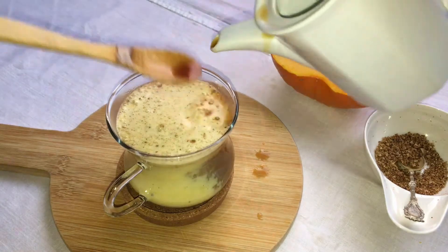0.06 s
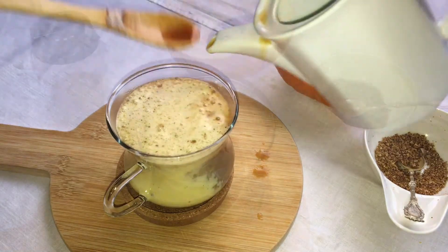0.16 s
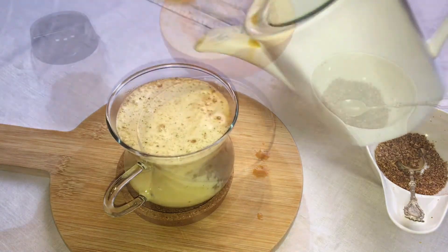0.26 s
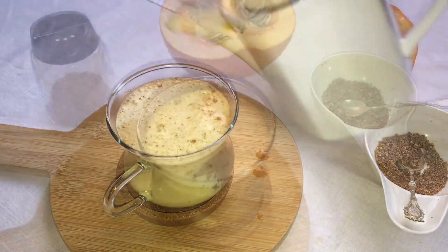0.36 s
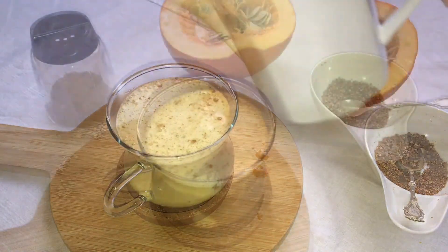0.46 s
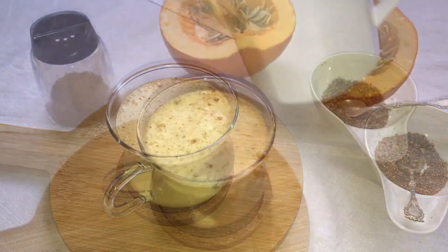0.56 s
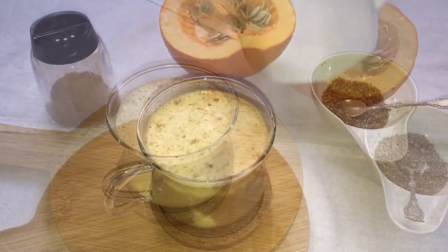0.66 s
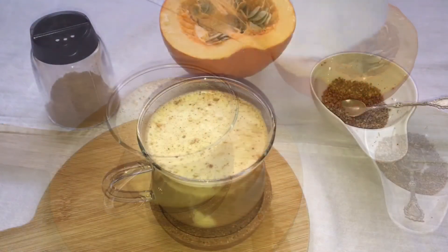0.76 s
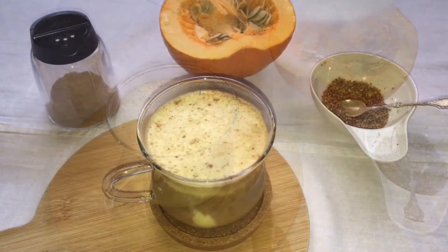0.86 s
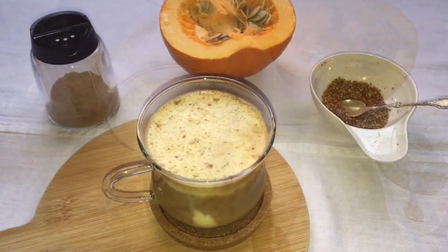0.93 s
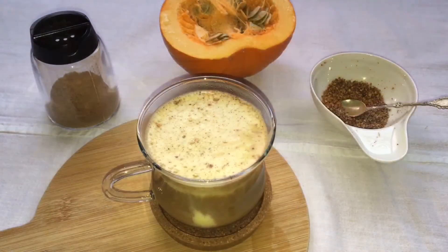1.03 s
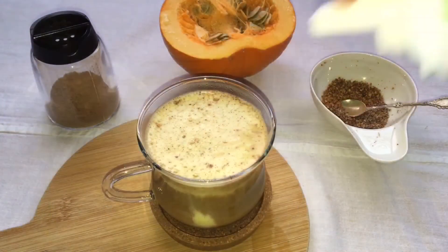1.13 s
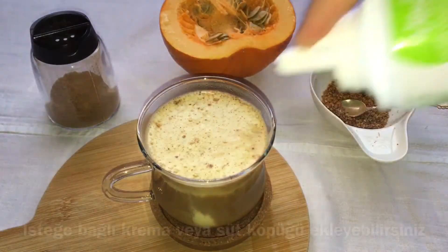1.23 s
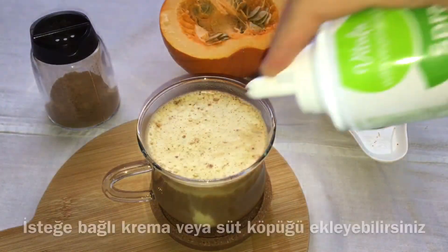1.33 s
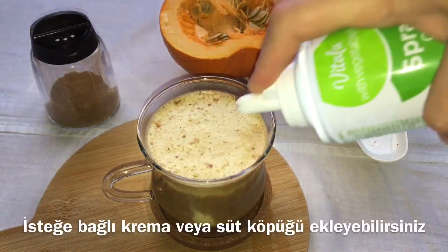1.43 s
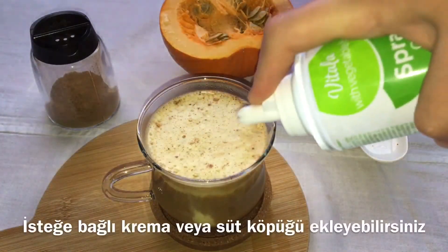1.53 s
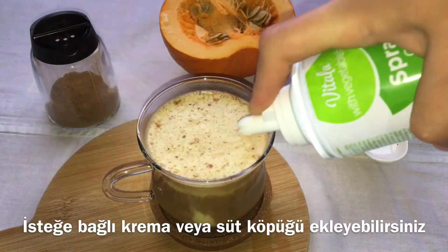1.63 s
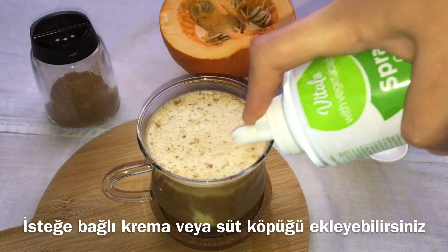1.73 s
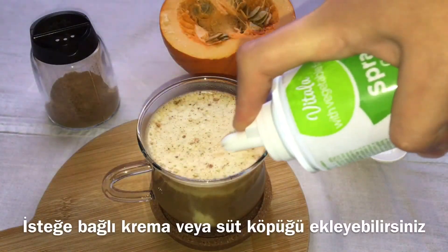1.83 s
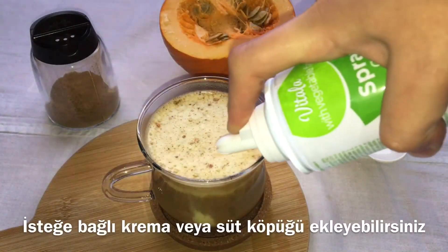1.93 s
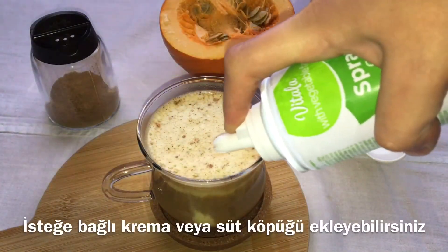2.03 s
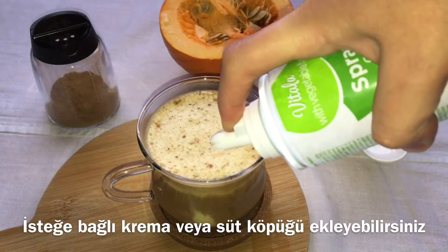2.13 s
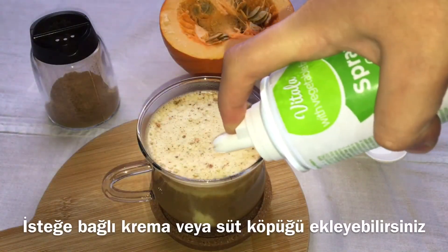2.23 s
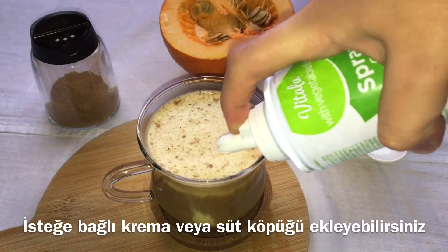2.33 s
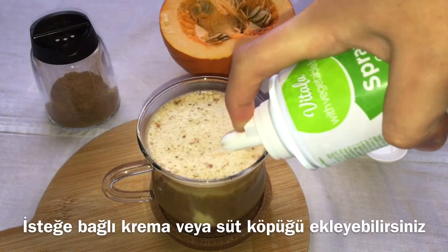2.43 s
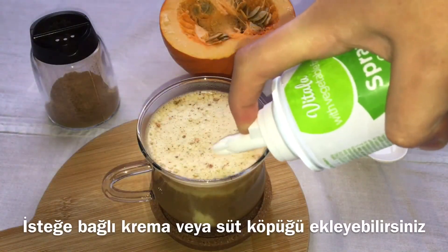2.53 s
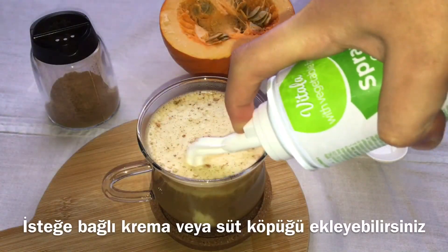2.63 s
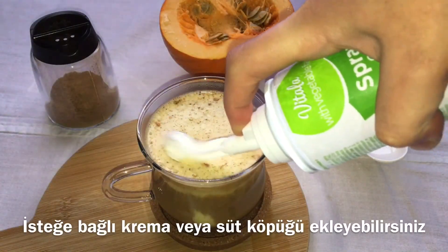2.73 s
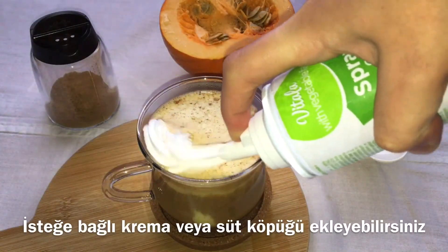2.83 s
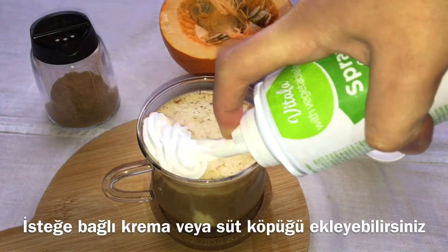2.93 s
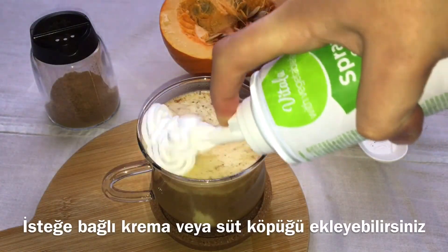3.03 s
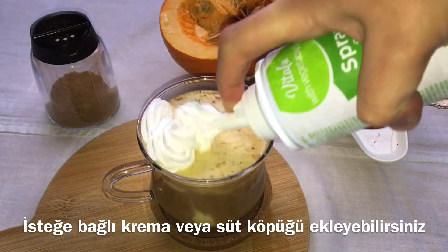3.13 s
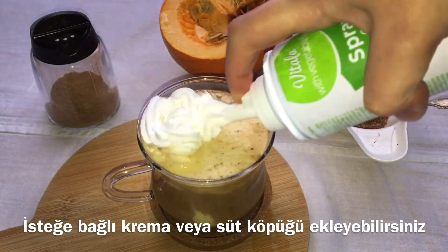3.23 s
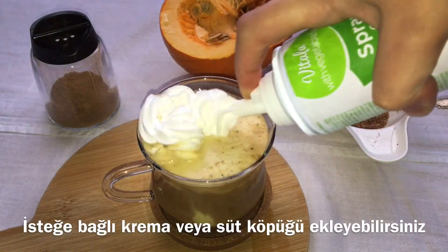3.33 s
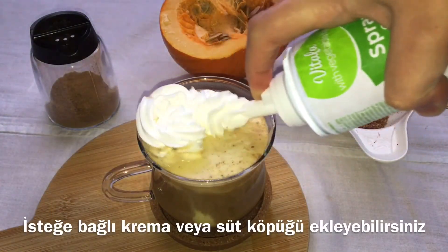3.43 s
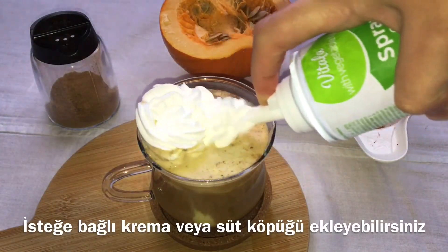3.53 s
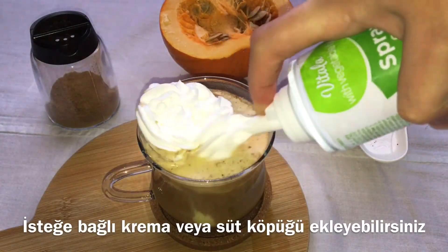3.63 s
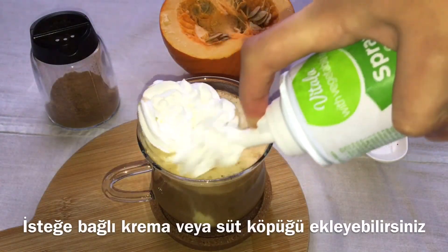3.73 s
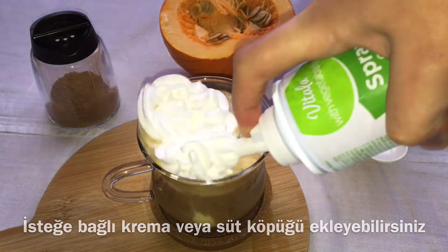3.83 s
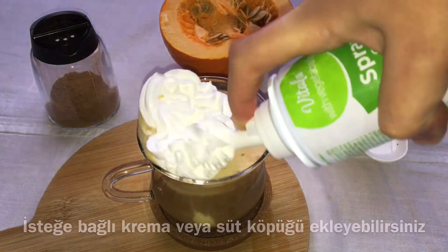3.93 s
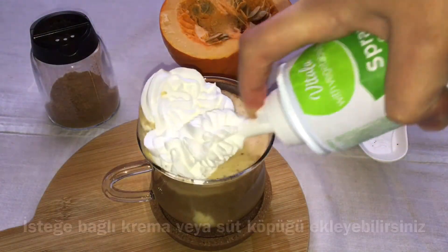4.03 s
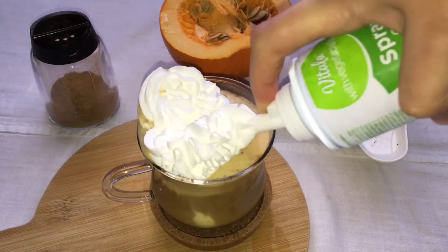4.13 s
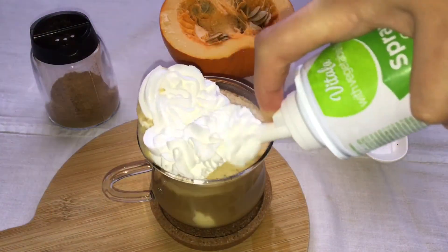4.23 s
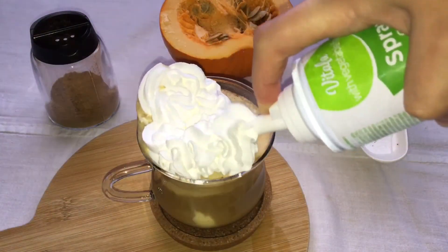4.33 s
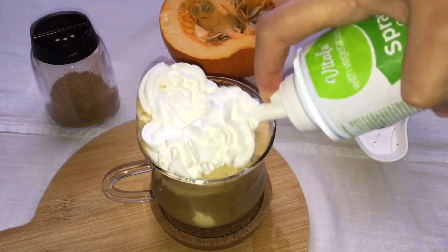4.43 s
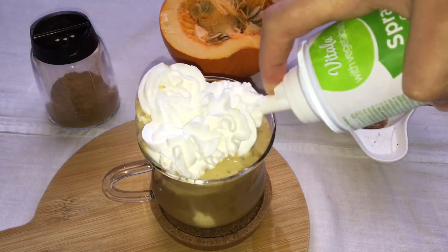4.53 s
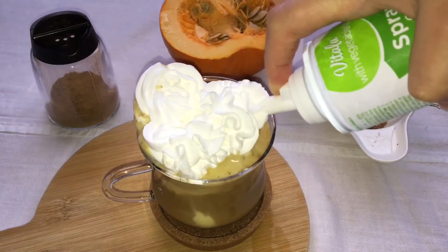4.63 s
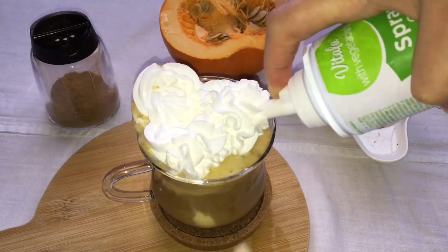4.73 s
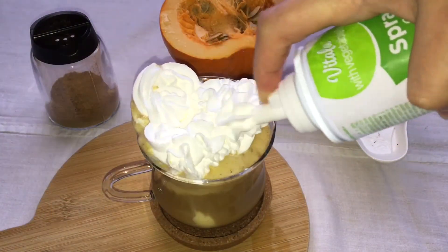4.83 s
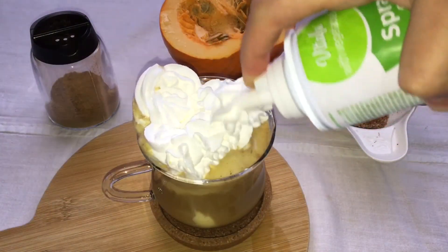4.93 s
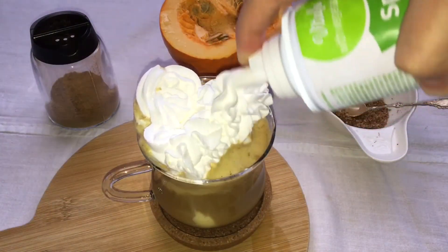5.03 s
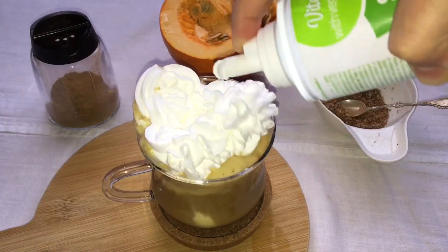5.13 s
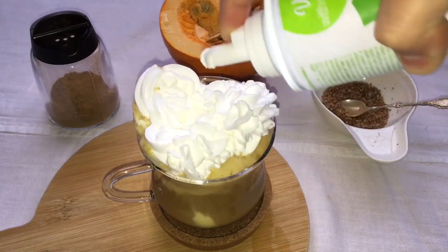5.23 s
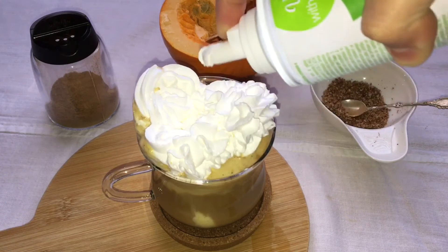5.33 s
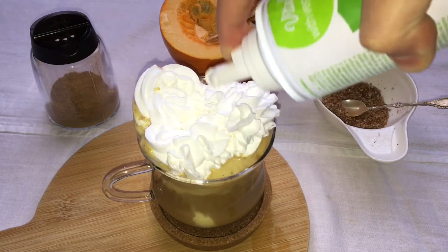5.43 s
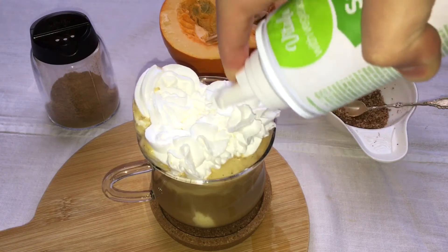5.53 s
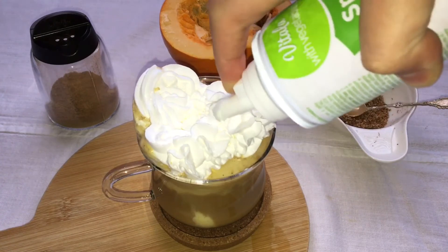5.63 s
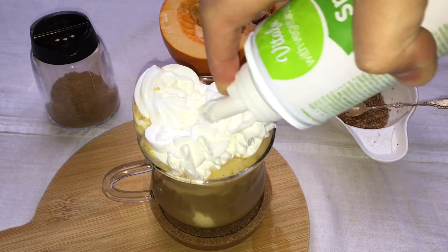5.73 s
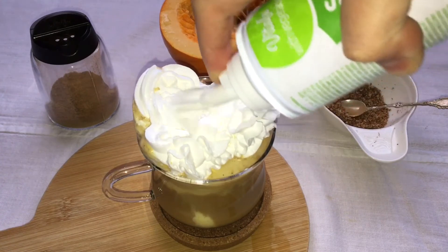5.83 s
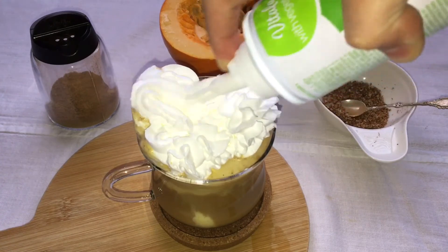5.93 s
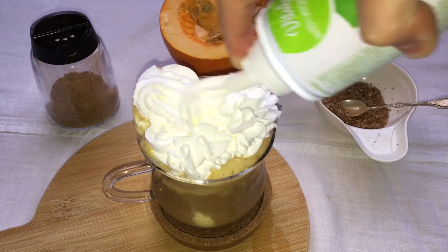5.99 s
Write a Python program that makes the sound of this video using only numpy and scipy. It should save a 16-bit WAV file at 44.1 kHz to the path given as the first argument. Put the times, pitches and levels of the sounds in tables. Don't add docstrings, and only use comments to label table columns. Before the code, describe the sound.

Close single microphone in a small, quiet room. Faint clinks, scraping and dull table thumps come first, then near silence. A pressurised can spits, then streams foam steadily onto a drink, a dense hiss full of tiny bubble pops and bigger wet bursts over a muffled gurgle. The flow breaks up and ends with a small tick. Under a second of room hush follows, then a softer, spluttering spray starts.

```python
import sys
import numpy as np
from scipy import signal
from scipy.fft import rfft, irfft
from scipy.io import wavfile
from scipy.ndimage import uniform_filter1d

SR = 44100
rng = np.random.default_rng(int(sys.argv[2]) if len(sys.argv) > 2 else 0)


def attenuation_scalar(level_db):
    decades = np.asarray(level_db, float) / 20
    return 10 ** decades


def waveform_to_disk(signal):
    frames = np.transpose(np.atleast_2d(signal))
    scaled = np.clip(frames, -1, 1) * 32767
    samples = np.round(scaled).astype(np.int16)
    wavfile.write(sys.argv[1], SR, samples)


N = 267246

# f/Hz, density/dB per Hz
ROOM_SPECTRUM = [(12, -38), (20, -5.5), (59, 4), (81, -2), (98, -12), (133, -11), (191, -12.5),
                 (220, -10.5), (260, -16), (507, -27.5), (963, -29.5), (1080, -30.5), (1170, -30.5),
                 (2280, -37), (15600, -44.5)]
# t/s, level/dB, rise/s, fall/s
TRAFFIC_SWELLS = [(.5, -69, 0.33, .1), (1.1, -72, 0.23, .1), (2.12, -68.5, 0.54, 0.25),
                  (2.7, -68, 0.17, 0.36), (3.14, -61.5, .12, 0.1), (3.8, -71.5, .3, 0.17),
                  (5.2, -65, .25, 0.11), (6.06, -64, 0.053, .1)]
ROOM_TONE_DB, RUMBLE_DB = -65, -80

KITCHEN_T60_S, BRIGHT_T60_S = 0.39, 0.3
KITCHEN_DB, HANDLING_ECHO_DB = -18.5, -11

# t/s, level/dB (peak)
SPOON_TAPS = [
    (.4665, -37),
    (.485, -54),
]
# f/Hz, level/dB, T60/s
SPOON_MODES = [(763, -21, 0.12), (1900, -6, 0.0088), (2160, -27, 0.29), (3070, 0, 0.028), (3480, -8, .008),
               (3790, -1.5, 0.031), (5000, 0, 0.0044), (6000, -9, 0.01), (8000, -30, 0.009)]
# t/s, level/dB (peak)
JUG_TAPS = [
    (.8432, -40),
    (.8442, -33.5),
    (.875, -51),
]
# f/Hz, level/dB, T60/s
JUG_MODES = [(794, 3, 0.022), (817, -16, .2), (1000, -19, 0.018), (1728, -1.5, 0.066), (2420, -3.5, 0.014),
             (2830, -9, 0.053), (2820, -30, 0.088), (3200, -38, 0.045), (6280, -19, 0.015)]
JUG_HELD_S, JUG_HELD_DB_PER_S = .884, -1200
# t/s, level/dB (peak)
TABLE_THUMPS = [(0.03, -50.5), (0.484, -57), (0.914, -48.5), (0.96, -48), (1.235, -49), (1.261, -49),
                (1.54, -40.5), (1.554, -37.5), (1.574, -32)]
# f/Hz, level/dB, T60/s
TABLE_MODES = [(126.5, -1.5, 0.68), (166.7, 1, 0.37), (203, -10, 0.54), (250.4, -10, 0.38),
               (330, -13, 0.35), (372.5, -19, 0.25), (490, -20, 0.1), (620, -14.5, 0.34), (760, -18, 0.12)]
# t/s, level/dB (peak), f/Hz, snap level/dB over the tick
TICKS = [(.445, -71, 4900, -2), (.619, -62, 1280, -8), (.655, -60, 5500, -2), (.67, -57, 1970, -8),
         (.709, -58, 1360, -8), (.722, -55, 1980, 0), (.742, -66, 2070, -6), (.7562, -48.5, 1000, -8),
         (.78, -56, 1300, -10), (.927, -55, 3000, -4), (1.068, -63, 1410, -8), (4.804, -36.5, 1530, -7)]
# t/s, level/dB, rise/s, fall/s
SCRAPES = [(.47, -61.5, 0.0039, 0.042), (.58, -83, .05, .1), (.66, -66, 0.067, 0.028),
           (.765, -66, .01, 0.051), (.933, -56.5, 0.015, 0.027), (1.0, -77.5, .05, .3)]
# t/s, level/dB, rise/s, fall/s
SWISHES = [(.485, -61.5, .01, 0.045), (.66, -71, .04, 0.035), (.76, -71, .04, .015), (.85, -69, .01, .03),
           (.935, -76, .01, 0.027), (1.1, -81, .1, .1)]
# t/s, level/dB, rise/s, fall/s
RIM_SINGING = [(.5, -67, .015, 0.053), (.6, -84, .04, .04), (.675, -69, .006, 0.017),
               (.72, -72, 0.017, .02), (.765, -72, .02, .015)]
# t/s, level/dB, rise/s, fall/s
LOOSE_THUDS = [(1.57, -52.5, 0.02, 0.083), (1.265, -62.5, .02, .02), (1.1, -65, .02, 0.026)]
# t/s, level/dB, rise/s, fall/s
VALVE_CREAKS = [
    (2.25, -76, .1, 0.018),
    (2.325, -77, .02, .04),
]
# t/s, level/dB, rise/s, fall/s
TABLE_HUM = [
    (4.1, -60, 0.21, 0.38),
]

# f/Hz, density/dB per Hz
JET_SPECTRUM = [(590, -27), (1000, -20.5), (2340, 1.5), (2780, -8), (3710, -1), (4840, -5.5), (5300, -8.5),
                (11200, -8), (15600, -16.5)]
# f/Hz, density/dB per Hz
BURBLE_SPECTRUM = [(53, -42), (90, -20), (118, -26.5), (324, -1), (500, -5), (655, -8.5), (786, -11.5),
                   (900, -13), (1170, -46), (1980, -120)]
# f/Hz, width/Hz, depth/dB
SPRAY_DIPS = [(495, 153, -7), (812, 75, -13.5), (1127, 12.6, -17.5), (2820, 1200, -1.5),
              (4870, 140, -14), (7740, 250, -6), (10450, 540, -6.5)]
# t/s, gas flow as hiss level/dB, cream load/dB over the gas
SPURT = [
    (2.42, -89, 1),
    (2.475, -64, 8.5),
    (2.52, -50, 3.5),
    (2.57, -47.5, 5),
    (2.59, -54, 1),
    (2.62, -57, 3.5),
    (2.69, -50, 0.5),
]
STREAM = [(2.712, -43, 3.5), (2.75, -40.5, 2.5), (3.14, -38, 0.5), (3.5, -39.5, 3), (3.86, -37, -1.5),
          (4.1, -38, 0.5), (4.3, -36.5, -2), (4.448, -37.5, 0)]
SPLUTTER = [(4.5, -45, 0.5), (4.53, -46.5, -3), (4.56, -44, 1), (4.64, -41, 0), (4.68, -43.5, 2),
            (4.76, -42, -0.5), (4.804, -44.5, -2)]
TOP_UP = [(5.64, -80, -9), (5.7, -67, 0), (5.73, -57.5, 6.5), (5.755, -54, -1), (5.785, -48.5, 9),
          (5.811, -43, 6), (5.9, -43.5, -0.5), (5.96, -44, 4), (6.06, -42, -1)]
# t/s, share of the hiss that skips the dips/0-1
CLEAR_SHARE = [(2.9, 0.23), (3.1, 0.33), (3.3, 0.1), (3.55, 0.12), (3.7, 0.48), (4.0, 0.47), (4.4, 0.42),
               (4.6, 0.22), (6.06, .1)]
# t/s, lift/dB, rise/s, fall/s
SMALL_BUBBLES = [
    (3.25, 4.5, 0.48, 0.55),
]
# t/s, level/dB (peak), f/Hz, snap level/dB over the pop
SPLATS = [(2.4812, -35.5, 1300, -18), (2.5203, -29, 1340, -15), (2.5693, -27, 1476, -12),
          (2.6222, -34, 1920, -10), (2.6344, -33, 1690, -8), (2.6572, -36, 1800, -9),
          (2.7162, -21, 1660, -10), (4.4712, -20.5, 2130, -3), (4.512, -24.5, 1850, -11),
          (4.546, -22.5, 2210, -1), (4.5578, -21, 1840, -6), (4.5787, -14.5, 2180, -12),
          (4.5894, -19, 2050, -17), (4.624, -21, 2100, -8), (4.6802, -23.5, 2500, -0.5),
          (4.7135, -31, 1660, -4), (4.719, -16.5, 2500, -8), (4.7389, -19.5, 1900, -8),
          (4.7595, -20, 2690, -1), (4.7828, -28.5, 1950, 10.5), (5.6785, -47.5, 2540, -2),
          (5.7194, -27, 1760, -20), (5.7746, -28, 1670, -13), (5.7626, -25.5, 1240, -17),
          (5.7829, -28, 1710, -17), (5.8926, -22.5, 2380, -16), (5.9472, -27, 1380, -12),
          (5.9671, -22, 2350, -4), (6.0016, -23.5, 1940, -8), (6.0515, -19, 1570, -15)]
# t/s, level/dB (peak)
BURSTS = [(2.9307, -24), (2.9529, -20.5), (3.0737, -16.5), (3.0924, -14.5), (3.1234, -15), (3.1329, -18),
          (3.1877, -20.5), (3.2057, -20), (3.2641, -15.5), (3.279, -20), (3.3083, -20), (3.3593, -25.5),
          (3.4349, -19), (3.4621, -16), (3.507, -17.5), (3.5841, -13.5), (3.6339, -17), (3.681, -16.5),
          (3.8988, -29), (3.9138, -13), (3.9903, -17), (3.9957, -15), (4.0644, -15.5), (4.1302, -16.5),
          (4.1753, -18), (4.2902, -22), (4.3424, -22), (4.3599, -17.5), (4.4375, -15.5)]
# t/s, level/dB over the hiss, rise/s, fall/s
LOWER_WHISTLE = [(3.1, -11, .1, 0.13), (3.75, -12.5, .08, .3), (4.4, -10, .2, .1)]
UPPER_WHISTLE_DB, UPPER_DB_PER_SHARE = -7, -45
FULL_POPS_PER_S, FULL_HISS_DB = 1800, -37
MUG_HZ, MUG_T60_S = 328, 0.024
BURBLE_FULL_DB, BURBLE_KNEE_DB, BURBLE_FOLLOWS, BURBLE_WOBBLE_DB = -49, -46.5, 1, 1.5
BURST_HZ, BURST_HZ_SPREAD = 2080, .08
BURST_SNAP_DB, SNAP_DB_PER_S, SNAP_SPREAD_DB = -10, 5, 1.5


def rms_one(x):
    return x / np.sqrt(np.mean(x ** 2) + 1e-20)


def evened(x, span_s):
    return x / np.sqrt(uniform_filter1d(x ** 2, size=round(span_s * SR)) + 1e-12)


def in_time(rows):
    s, *columns = np.transpose(rows)
    return [np.interp(np.arange(N) / SR, s, c) for c in columns]


def level(rows, column):
    rows = np.array(rows)
    return attenuation_scalar(np.interp(np.arange(N) / SR, rows[:, 0], rows[:, column], left=-140, right=-140))


def swells(rows):
    t = np.arange(N) / SR
    return sum(attenuation_scalar(db) * np.exp(-np.where(t < s, (s - t) / rise, (t - s) / fall))
               for s, db, rise, fall in rows)


def drift(rate):
    r = np.exp(-2 * np.pi * rate / SR)
    slow = signal.lfilter([1], [1, -2 * r, r * r], rng.standard_normal(N + SR))[SR:]
    return rms_one(slow - slow.mean())


def coloured(spectrum):
    hz, db = np.transpose(spectrum)
    bins = np.maximum(np.arange(N // 2 + 1) * SR / N, 1)
    gain = attenuation_scalar(np.interp(np.log(bins), np.log(hz), db))
    return rms_one(irfft(rfft(rng.standard_normal(N)) * gain, N))


def band(x, low_hz, high_hz):
    return signal.sosfilt(signal.butter(2, [low_hz, high_hz], "band", fs=SR, output="sos"), x)


def ring(clicks, hz, t60):
    r, w = attenuation_scalar(-60 / (t60 * SR)), 2 * np.pi * hz / SR
    return signal.lfilter([0, np.sin(w)], [1, -2 * r * np.cos(w), r * r], clicks + 1e-18)


def struck(hits, modes, soft_hz, thin_hz, scatter_db):
    hits, out = np.array(hits), 0
    luck = rng.standard_normal((len(hits), len(modes)))
    for k, (hz, db, t60) in enumerate(modes):
        clicks = np.zeros(N)
        clicks[(hits[:, 0] * SR).astype(int)] = -attenuation_scalar(hits[:, 1] + db + scatter_db * luck[:, k])
        out = out + ring(clicks, hz, t60)
    return band(out, thin_hz, soft_hz)


def blips(events, turns, snap_db, masked=0):
    length = 800
    out = np.zeros(N + length)
    t = np.arange(length) / SR
    puff = band(rng.standard_normal((len(events), length)), 5000, 11000)
    for (s, db, hz, bright_db), noise in zip(events, puff):
        u = t * hz / turns
        overtone = 0.41 * np.exp(-.3 * u) * np.sin(4.1 * np.pi * hz * t)
        swing = -np.e * u * np.exp(-u) * (np.sin(2 * np.pi * hz * t) - overtone)
        snap = attenuation_scalar(snap_db + bright_db) * noise * np.exp(-t / 0.0016)
        height = max(attenuation_scalar(db) - (masked * np.ones(N))[round(s * SR)], attenuation_scalar(db - 14))
        out[round((s - turns / hz) * SR):][:length] += height * (swing + snap)
    return out[:N]


def hush():
    tone = coloured(ROOM_SPECTRUM)
    rumble = rms_one(signal.sosfilt(signal.butter(4, 110, fs=SR, output="sos"), tone))
    rumble = 0.89 * rumble + 0.7 * rms_one(ring(tone, 49.5, 0.65))
    upper = rms_one(signal.sosfilt(signal.butter(4, 110, "high", fs=SR, output="sos"), tone))
    return attenuation_scalar(ROOM_TONE_DB) * upper + (attenuation_scalar(RUMBLE_DB) + swells(TRAFFIC_SWELLS)) * rumble


def kitchen(x):
    t = np.arange(SR // 2) / SR
    white = rng.standard_normal((2, len(t)))
    tail = band(white[0], 80, 4040) * attenuation_scalar(-60 * t / KITCHEN_T60_S)
    tail = tail + band(white[1], 5100, 12000) * attenuation_scalar(-60 * t / BRIGHT_T60_S)
    tail = tail * np.clip((t - .004) / 0.004, 0, 1)
    return signal.fftconvolve(x, tail / np.sqrt(np.sum(tail ** 2)))[:N]


def rustle():
    low, high = rng.standard_normal((2, N)) * attenuation_scalar(2.2 * drift(60))
    scrape = swells(SCRAPES) * rms_one(band(low, 320, 1840))
    singing = swells(RIM_SINGING) * rms_one(ring(low, 2070, 0.03))
    thuds = swells(LOOSE_THUDS) * rms_one(band(high, 110, 244))
    swish = swells(SWISHES) * rms_one(band(high, 2300, 7700))
    return scrape + singing + thuds + swish


def handling():
    spoon = struck(SPOON_TAPS, SPOON_MODES, soft_hz=10800, thin_hz=596, scatter_db=0)
    jug = struck(JUG_TAPS, JUG_MODES, soft_hz=9000, thin_hz=560, scatter_db=0)
    jug = jug * attenuation_scalar(JUG_HELD_DB_PER_S * np.maximum(np.arange(N) / SR - JUG_HELD_S, 0))
    table = struck(TABLE_THUMPS, TABLE_MODES, soft_hz=450, thin_hz=103, scatter_db=3.5) * attenuation_scalar(-8)
    ticks = blips(TICKS, turns=1.0, snap_db=1.0)
    creak = swells(VALVE_CREAKS) * attenuation_scalar(2.0) * rms_one(ring(rng.standard_normal(N), 1246, 0.049))
    hum = swells(TABLE_HUM) * rms_one(ring(rng.standard_normal(N), 121.4, 0.7))
    return hum + spoon + jug + table + ticks + rustle() + creak


def dips(x):
    for hz, width, db in SPRAY_DIPS:
        a, w = attenuation_scalar(db / 2), 2 * np.pi * hz / SR
        k = np.pi * width / SR
        top = [1 + k * a, -2 * np.cos(w), 1 - k * a]
        x = signal.lfilter(top, [1 + k / a, -2 * np.cos(w), 1 - k / a], x)
    return x


def grains(per_s, low_hz, high_hz, turns, spread_db):
    sizes = -attenuation_scalar(spread_db * np.minimum(rng.exponential(1, N), 4.0))
    popped = rng.random(N) < per_s * attenuation_scalar(2.6 * drift(30)) / SR
    clicks = sizes * popped / np.sqrt(per_s)
    pitches = np.geomspace(low_hz, high_hz, num=14)
    dealt = rng.integers(0, 14, size=N)
    return clicks, sum(ring(clicks * (dealt == k), hz, turns / hz) for k, hz in enumerate(pitches))


def pockets():
    s, db = np.transpose(BURSTS)
    luck = rng.standard_normal((len(s), 2))
    hz = BURST_HZ * np.exp(BURST_HZ_SPREAD * luck[:, 0])
    snap = BURST_SNAP_DB + SNAP_DB_PER_S * (s - s.mean()) + SNAP_SPREAD_DB * luck[:, 1]
    return np.vstack([SPLATS, np.transpose([s, db - 2.5, hz, snap])])


def gas_jet(hiss, clicks, direct):
    tear = rms_one(signal.lfilter([1], [1, -.97], np.abs(clicks)))
    white = rng.standard_normal((2, N))
    upper = attenuation_scalar(UPPER_WHISTLE_DB + UPPER_DB_PER_SHARE * direct) * rms_one(band(white[0], 10800, 11700))
    lower = swells(LOWER_WHISTLE) * rms_one(band(white[1], 5150, 5900))
    noise = coloured(JET_SPECTRUM) + upper + lower
    return attenuation_scalar(3.5) * hiss * evened(noise * (1 + 0.5 * tear), span_s=0.1)


def popping_foam(clicks, rings):
    cracks = rms_one(band(clicks, 1560, 7700))
    small = swells(SMALL_BUBBLES) * band(rings, 1650, 2900)
    return evened(rms_one(band(rings, 840, 5400) + small) + 0.29 * cracks, span_s=0.081)


def burbling_heap(clicks, per_s):
    thuds = rms_one(band(ring(clicks, MUG_HZ, MUG_T60_S), 190, 940))
    large = grains(per_s / 8, low_hz=190, high_hz=600, turns=8.0, spread_db=0.5)[1]
    gurgle = rms_one(band(large, 79, 960))
    return 0.82 * coloured(BURBLE_SPECTRUM) + 0.3 * thuds + .5 * gurgle


def spray():
    first = SPURT + STREAM + SPLUTTER
    hiss = level(first, column=1) + level(TOP_UP, column=1)
    pops = hiss * attenuation_scalar(in_time(first + TOP_UP)[1])
    low = attenuation_scalar(BURBLE_FULL_DB + BURBLE_WOBBLE_DB * drift(7.4))
    low = low * np.minimum(pops / attenuation_scalar(BURBLE_KNEE_DB), 1) ** BURBLE_FOLLOWS
    direct, = in_time(CLEAR_SHARE)
    per_s = np.clip(FULL_POPS_PER_S * (hiss / attenuation_scalar(FULL_HISS_DB)) ** .4, 600, 4000)
    clicks, rings = grains(per_s, low_hz=1062, high_hz=2610, turns=7.3, spread_db=3.0)
    jet = gas_jet(hiss, clicks, direct)
    foam = pops * popping_foam(clicks, rings)
    burble = attenuation_scalar(.5) * low * burbling_heap(clicks, per_s)
    bursts = blips(pockets(), turns=0.47, snap_db=0.0, masked=2.1 * pops)
    direct = np.clip(direct, 0, 1)
    reflected = dips((1 - direct) * jet + foam + burble + bursts)
    return reflected + 1.12 * direct * band(jet, 2660, 22000)


def scene():
    jet, hands = spray(), handling()
    echoes = attenuation_scalar(KITCHEN_DB) * kitchen(jet + attenuation_scalar(HANDLING_ECHO_DB) * hands)
    return (jet + hands + echoes + hush())[None]


def top_cut(x):
    return signal.sosfilt(signal.butter(12, 15780, fs=SR, output="sos"), x)


def record(dry):
    return top_cut(dry)


dry = scene()
out = record(dry)
waveform_to_disk(out)
```